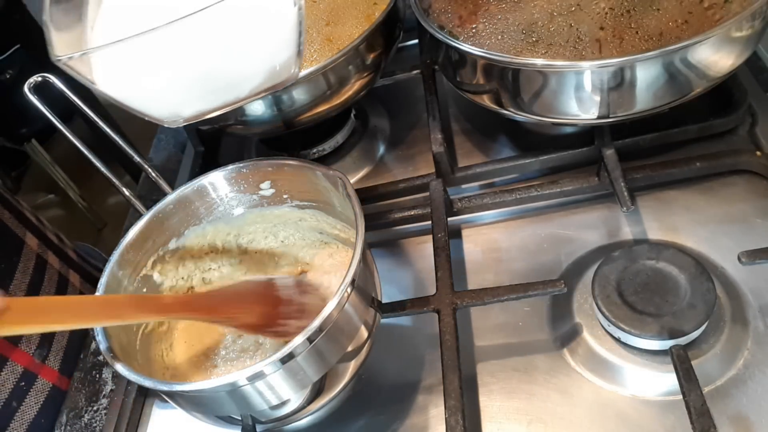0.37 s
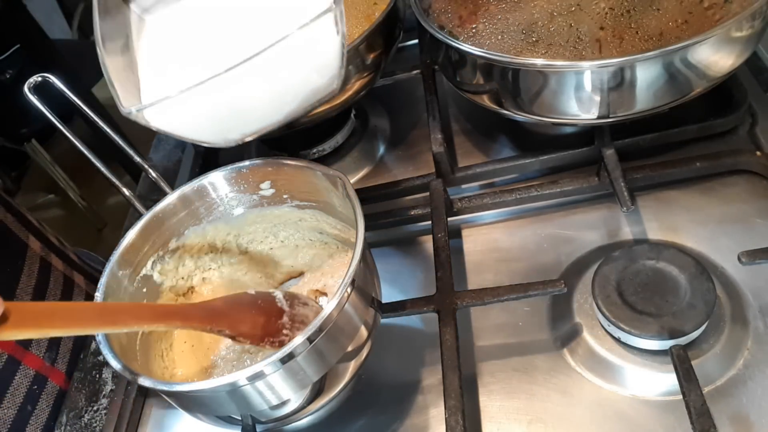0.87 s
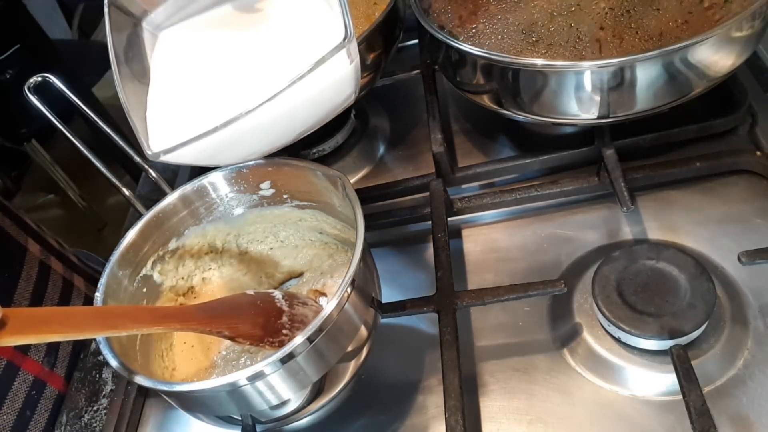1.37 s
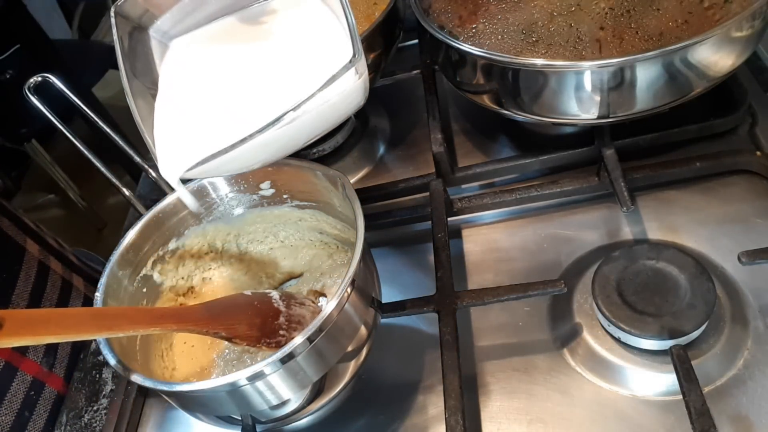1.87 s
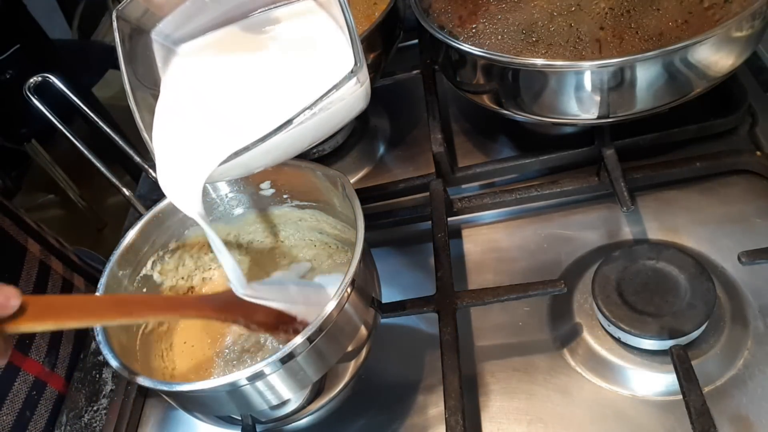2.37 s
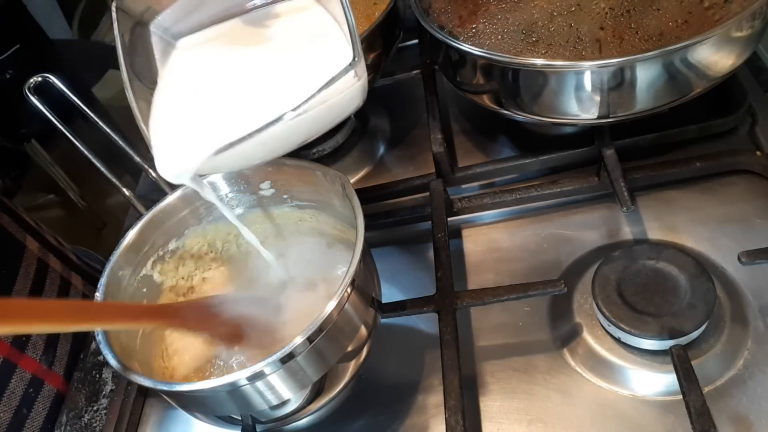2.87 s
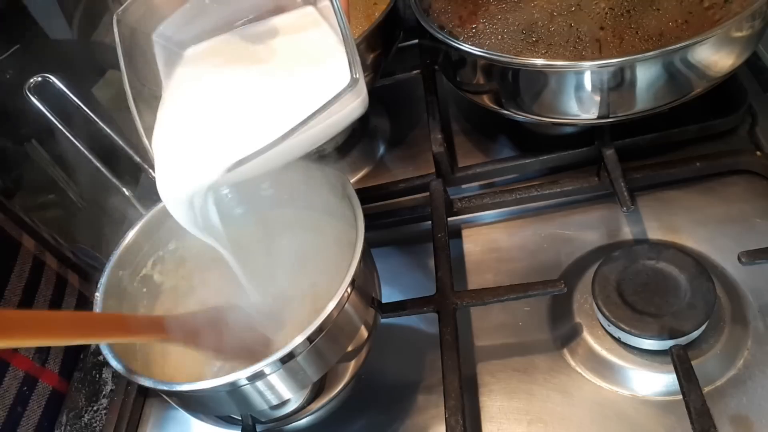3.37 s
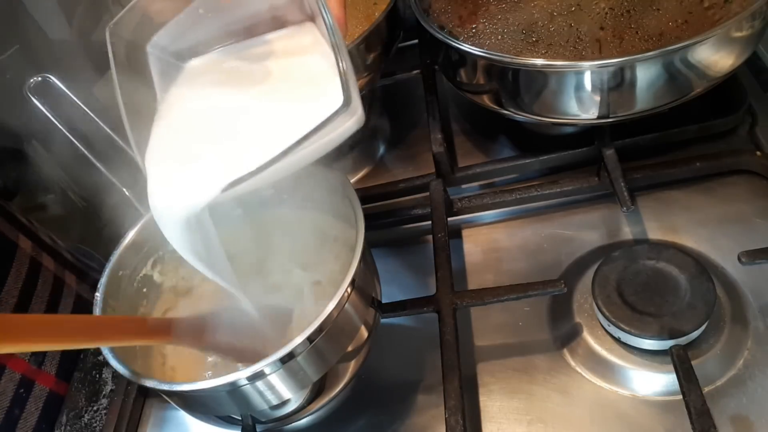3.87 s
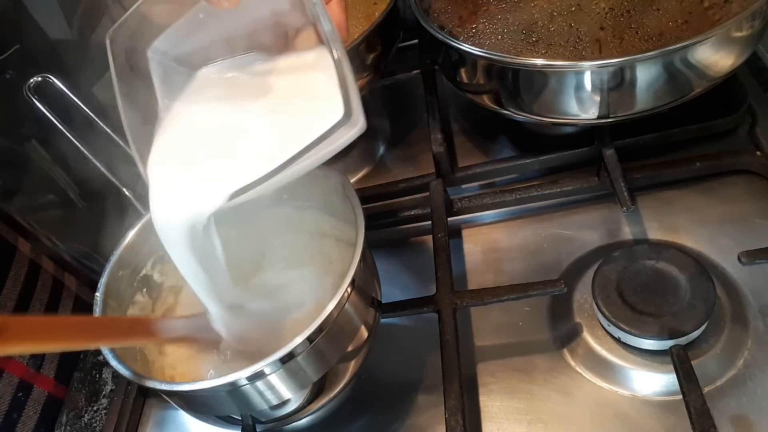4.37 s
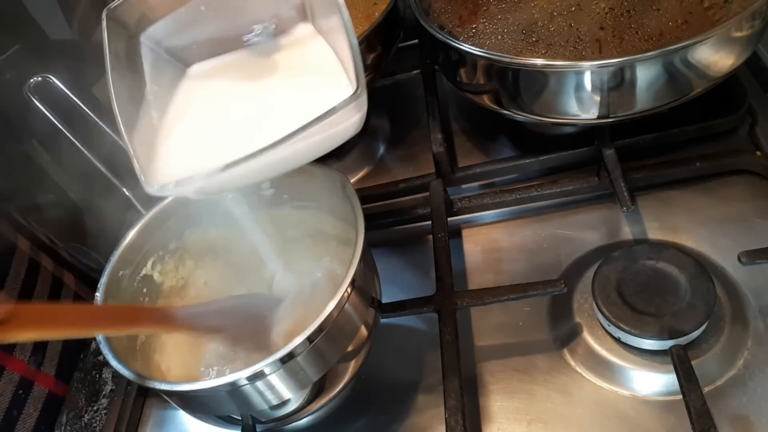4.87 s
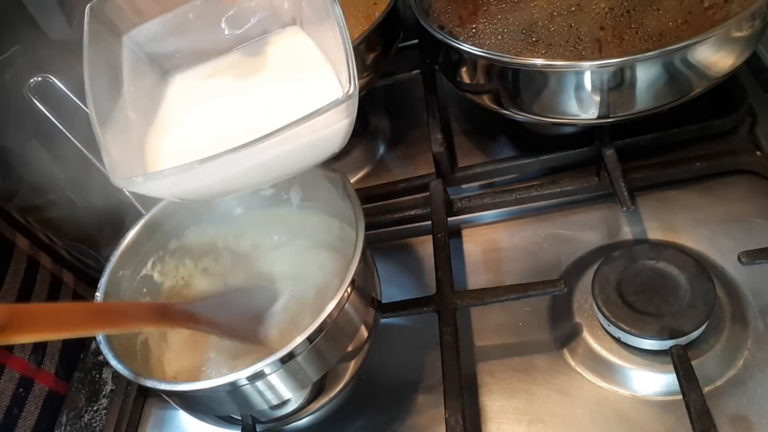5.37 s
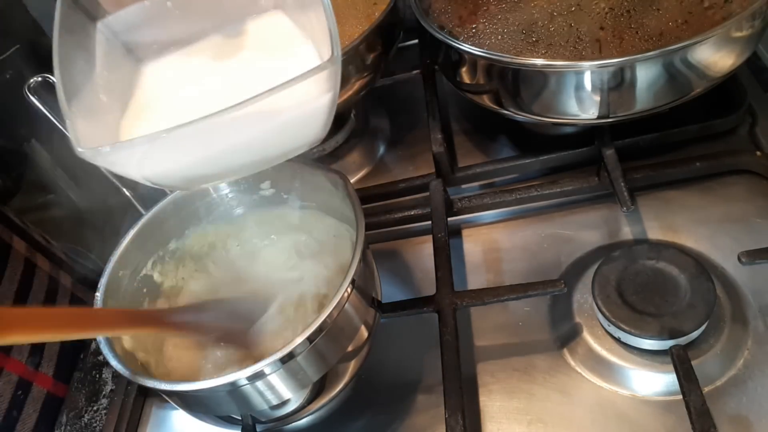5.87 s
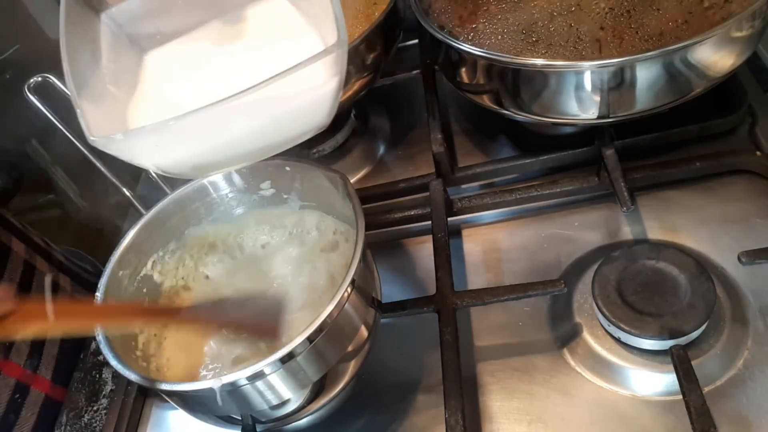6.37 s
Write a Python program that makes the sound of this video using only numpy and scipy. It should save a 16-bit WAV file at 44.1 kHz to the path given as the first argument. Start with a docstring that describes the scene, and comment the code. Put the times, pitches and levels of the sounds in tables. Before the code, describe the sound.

Fat ticks quietly in a hot pan over a low gas flame, then poured milk erupts into a loud steamy hiss and bubbling boil.

```python
"""Milk poured into hot butter and flour

In a kitchen, with a small two-port microphone close to a steel pan on a gas stove.
Fat ticks and sizzles as filtered noise over the burner's low roar, and a wooden spoon nudges and scrapes.
Cold milk lands: flickering noise, coloured as jets of many sizes, bursts out in a wide hiss of steam.
Boiling bubbles are noise and short pushes that ring the pan and its air, drum on its base and plop in tones."""
import sys
import numpy as np
from scipy import signal
from scipy.fft import rfft, irfft
from scipy.io import wavfile
from scipy.ndimage import uniform_filter1d

SR = 44100
rng = np.random.default_rng(int(sys.argv[2]) if len(sys.argv) > 2 else 0)


def gain_from_decibels(decibels):
    """Convert decibel values to linear amplitude factors."""
    exponent = np.asarray(decibels, float) / 20
    return 10 ** exponent


def output_pcm(signal):
    """Save a mono or channel-first signal as 16-bit PCM at the path in sys.argv[1].

    Samples are clipped to [-1, 1] before scaling.
    """
    pcm = np.clip(np.atleast_2d(signal).T, -1, 1) * 32767
    wavfile.write(sys.argv[1], SR, np.round(pcm).astype(np.int16))


N = 287310
T = np.arange(N) / SR
HZ = np.fft.rfftfreq(N, 1 / SR)
POUR_S = 2.083  # the first drop of milk lands

# Likeness of the two ports: (frequency [Hz], likeness [0 to 1])
PORT_LIKENESS = [(65, .95), (100, .99), (200, .95), (300, .8), (460, .52), (690, .8), (820, .96),
                 (1150, .72), (1900, .62), (3100, .18), (4400, .25), (7000, .04)]
# Phase by which the left port leads: (frequency [Hz], lead [rad])
PORT_LEAD = [(200, 0), (370, -1.0), (500, -.8), (600, .15), (950, -.5), (1250, -.1), (2200, -.8), (2700, 0)]
# Level difference of the ports: (frequency [Hz], left-right [dB])
PORT_LEAN = [(65, 1), (150, 1.6), (220, 3.3), (300, 3), (490, -6), (600, 3), (820, 3.2), (1150, -1),
             (1900, 0), (15000, .5)]
# Kitchen air spectrum, overall level set apart: (frequency [Hz], relative density [dB per Hz])
KITCHEN_AIR = [(18, -47), (30, -17), (106, -7), (384, -27), (449, -14), (499, -18), (844, -22),
               (1220, -28.5), (3580, -30), (6720, -24), (16000, -52)]
# Appliance hum: (mean frequency [Hz], level [dB])
HUM_TONES = [(100, -69), (447, -79)]
# Low resonances of stove and kitchen, widths before widening:
# (frequency [Hz], width [Hz], relative level under the flame [dB], relative level under the boiling [dB])
STOVE_MODES = [(64.7, 31, -6.5, -22), (95.3, 22.5, 2, -6.5), (147.6, 11, -2, -3), (198, 12, -10, -5.5),
               (282.4, 91, -18.5, -3.5), (348.3, 11, -22, -0.5), (448.7, 28, -28, -2.5),
               (546, 15.6, -29, -2)]
# Seething on the pan base as the milk pools: (time [s], level [dB])
BASE_SEETHE = [(2.1, -72), (2.23, -68), (2.33, -53), (2.52, -52), (2.61, -45.5), (3.8, -47), (4.45, -42.5),
               (5.2, -43.5), (5.6, -42.5), (6.3, -45), (6.51, -48)]
# Steady sizzle of the dry pan: (tearing jets [dB], fine jets [dB], pan ring [dB])
STEADY_SIZZLE = (-75, -82, -81)
# Louder sizzle where the paste is turned:
# (time [s], fade [s], tearing jets [dB], fine jets [dB], pan ring [dB])
PASTE_STIRS = [(.05, .015, -68, -68, -88), (.27, 0.069, -66, -71, -80), (.46, 0.056, -51, -57, -58),
               (.65, 0.12, -60, -62.5, -73), (.95, 0.076, -69, -85, -81), (1.28, 0.074, -85, -88, -79),
               (1.58, 0.087, -72, -82, -78), (1.98, .05, -68, -84, -90)]
# Fat spitting in the dry pan: (time [s], peak level [dB], pitch [Hz], left-right [dB])
FAT_TICKS = [(0.089, -48, 6950, 1.0), (0.229, -44, 6540, -2), (0.2598, -48, 5400, -1.0),
             (0.2763, -44, 6700, -4), (0.3391, -45, 5050, -3), (0.3676, -48, 6150, 0.5),
             (0.3935, -40, 5700, 0.5), (0.4309, -41, 6140, -3), (0.5975, -44, 4300, 0.0),
             (0.6564, -42.5, 4000, 4), (0.6918, -43, 7440, 0.0), (0.7462, -46.5, 4600, -1.0),
             (0.7913, -41, 4940, -3), (0.927, -44, 6400, 3), (0.9662, -48, 4600, 2.5),
             (1.016, -49, 3900, 2), (1.058, -48.5, 5030, 0.0), (1.3733, -51, 4700, 7),
             (1.3987, -50, 6200, 2.0), (1.4192, -53, 4300, 9), (1.448, -47, 4760, 0.5),
             (1.502, -47, 6700, -6), (1.5229, -52, 6780, -0.5), (1.5404, -47, 6460, 1.0),
             (1.5718, -46, 6240, 1.0), (1.6277, -45, 6250, -3), (1.6535, -55, 6440, 2),
             (1.7884, -57, 4830, 0), (1.8467, -50, 6930, -3), (1.941, -49, 7460, -3.0),
             (1.9625, -41.5, 5400, 1.0), (2.0025, -40, 4570, 1), (2.0358, -48, 4790, 0.5),
             (2.0537, -46, 4810, -1.5), (2.0832, -37, 6070, -4)]
# Pan and the air in it: (frequency [Hz], width [Hz], relative level [dB])
PAN_MODES = [(662.6, 90, -11), (776.7, 19, -5.5), (833.5, 35.6, 0), (890, 71.4, -2), (954, 47.4, -4.5),
             (1006, 43, -9), (1090, 27, -13), (1192, 43, -14.5), (1341, 16, -5), (1412, 29, -7),
             (1733, 235, -6.5), (1700, 91, -15.5), (1864, 46, -5), (2031, 62, -2), (2081, 55, -4),
             (2324, 112, -9), (2592, 41, -4.5), (2747, 145, -5.5), (2900, 250, 0), (2969, 250, -3),
             (4050, 960, -12)]
# Wooden spoon nudging the pan: (time [s], peak level of the low modes [dB], upper against low modes [dB])
SPOON_NUDGES = [(0.348, -52, -6), (0.472, -56, -7), (0.509, -47, -16), (0.605, -57, -5), (0.72, -60, 1),
                (1.353, -56, -12), (1.522, -65, -10), (1.569, -57.5, -12)]
# Spoon strokes: (start [s], end [s], level [dB], rasp frequency [Hz], rasp width [Hz])
SPOON_STROKES = [(.23, 0.306, -74, 2900, 505), (.3, .42, -72, 1660, 250), (0.325, 0.378, -73, 2900, 400),
                 (0.37, .472, -64.5, 2750, 500), (.35, 0.643, -69, 814, 70),
                 (1.225, 1.42, -68.5, 790, 1100)]
# Steam off the hot base once milk is in: (time [s], hiss level [dB])
STEAM_HISS = [(2.09, -84), (2.13, -37.5), (2.2, -42), (2.3, -46), (2.45, -43.5), (2.6, -37), (2.66, -31),
              (2.8, -27), (3.32, -24), (3.66, -30), (3.9, -30.5), (4.15, -30.5), (4.44, -28), (4.7, -29),
              (5.0, -30), (5.5, -33), (6.0, -35), (6.25, -36.5), (6.51, -37.5)]
# Coarse jets, before their bass loss: (frequency [Hz], relative density [dB per Hz])
COARSE_JETS = [(1820, -7), (3100, 0), (3670, -4), (4050, 0), (5840, -3), (6440, -1), (7840, -2.5),
               (8770, -12.5), (9500, -13.5), (12400, -31), (20900, -120)]
# Jets tearing through the fat, before their bass loss: (frequency [Hz], relative density [dB per Hz])
TEARING_JETS = [(880, -51), (1500, -32), (3230, -2), (3520, -7), (3940, -1), (6250, -2.5), (8040, -4),
                (8930, -19), (12000, -10), (15600, -39), (22000, -120)]
# Fine jets, before their bass loss: (frequency [Hz], relative density [dB per Hz])
FINE_JETS = [(5000, -47), (8500, -6), (9150, -4), (10800, 2.5), (12600, 2.5), (15100, 2.5), (15900, -11.5)]
# Jets tearing open: (time [s], fine jets [dB], tearing jets [dB], rise [s], fade [s])
JET_SPURTS = [(2.0833, -44, -66, .001, 0.017), (2.13, -35, -45, 0.017, 0.034),
              (2.16, -33, -24, 0.019, 0.024), (2.249, -45, -33, .015, 0.008),
              (2.325, -28, -39, 0.00083, .014), (2.36, -26, -34, .008, 0.008),
              (2.397, -31, -40, .006, 0.0083), (2.426, -33, -36, .001, 0.043),
              (2.493, -28, -28, 0.0047, 0.028), (2.57, -34, -33, .01, .02),
              (2.65, -24, -20.5, 0.022, 0.054), (2.865, -24, -23.5, 0.018, 0.043),
              (2.72, -32, -24.5, 0.017, 0.072), (2.94, -26, -27, .01, 0.024), (2.99, -39, -31, .01, 0.014),
              (3.139, -31, -24.5, 0.023, 0.0062), (3.94, -33, -26.5, 0.0035, 0.11),
              (4.44, -32, -28, 0.047, 0.013), (5.55, -41, -33, 0.014, 0.013), (5.62, -33, -30, 0.056, .008),
              (5.67, -47, -31, 0.009, 0.015), (5.725, -43, -28, .01, .015), (5.81, -44, -36, .003, .02),
              (5.945, -28, -30, .002, 0.032), (6.22, -39, -35, 0.017, 0.022),
              (6.31, -34, -32, 0.0072, 0.022)]
# Bursting bubbles, small ones ring the upper modes:
# (time [s], level of the low modes [dB], upper against low modes [dB])
BUBBLE_BOIL = [(2.09, -80, -4), (2.16, -50.5, 7), (2.21, -39.5, 1.5), (2.28, -32, -12), (2.36, -30.5, -3.5),
               (2.55, -30, -3), (2.8, -30, 1.5), (3.1, -30, 3.5), (3.4, -31.5, 1), (3.65, -31, -4.5),
               (4.1, -36, 0.5), (4.5, -33.5, 1), (5.0, -35, -0.5), (5.3, -38, 1), (5.6, -37, 2),
               (5.9, -34, -0.5), (6.1, -37.5, 1), (6.51, -43.5, 2)]
# Clusters of large bubbles swell the lowest pan modes: (time [s], peak level [dB])
BUBBLE_CLUSTERS = [(2.281, -38), (2.362, -22.5), (2.415, -26), (2.679, -30), (2.77, -29), (3.121, -25.5),
                   (3.3, -32), (3.62, -30), (4.058, -28.5), (4.171, -24.5), (4.31, -31), (4.53, -24),
                   (4.7, -31), (4.88, -31), (4.989, -26.5), (5.22, -31), (5.288, -27), (5.35, -27),
                   (5.4, -24.5), (5.67, -28), (5.729, -24.5), (5.819, -28), (6.07, -34), (6.113, -26),
                   (6.221, -37), (6.291, -33.5), (6.49, -32.5)]
# Large bubbles bursting: (time [s], peak level of the low modes [dB], upper against low modes [dB])
BUBBLE_POPS = [(2.358, -21.5, -6), (2.395, -22, -6), (2.461, -17.5, -5), (2.565, -24, 6), (2.644, -26, -7),
               (2.746, -21, 4), (2.809, -14, -4), (2.972, -13.5, -8), (3.103, -26, -12), (3.242, -31, -6),
               (3.341, -33, -10), (3.563, -19.5, -16), (3.615, -26, -10), (3.702, -24.5, -14),
               (4.164, -21, -14), (4.319, -36, -5), (4.433, -20.5, 2), (4.515, -29, -6), (5.287, -21, -3),
               (5.466, -22.5, -5), (5.552, -25.5, -14), (5.709, -28, -4), (5.807, -31, -1),
               (5.898, -25, -12), (6.108, -22, -8)]
# Sharp snaps in the boiling milk: (time [s], peak level [dB], pitch [Hz], left-right [dB])
MILK_SNAPS = [(2.366, -24, 1850, -0.5), (3.3104, -23, 2880, -3), (3.4298, -20, 4010, 0),
              (6.103, -13.5, 4050, -9)]
# Round bubbles plopping in the thickening sauce:
# (time [s], peak level of the tone [dB], pitch at the peak [Hz], left-right [dB])
SAUCE_PLOPS = [(2.795, -24, 1920, 5), (4.471, -29.5, 2780, 0), (5.445, -35, 1920, -1),
               (6.014, -29.5, 1960, 4), (6.467, -36, 1970, -1)]


def evened(x):
    """Scales to rms 1."""
    return x / np.sqrt(np.mean(x ** 2) + 1e-20)


def read(points, hz):
    """Reads a spectrum on a log-frequency axis."""
    f, value = np.transpose(points)
    return np.interp(np.log(hz + 1), np.log(f + 1), value)


def columns(rows):
    """Curve columns at every sample."""
    s, *values = np.transpose(rows)
    return [np.interp(T, s, v) for v in values]


def sides(left_right_db):
    """Left and right gains that differ by the given dB."""
    return gain_from_decibels(np.array([[left_right_db], [-left_right_db]]) / 2)


def add_at(out, s, sound):
    """Adds a short sound in place, starting at s seconds."""
    part = out[:, round(s * SR):][:, :sound.shape[1]]
    part += sound[:, :part.shape[1]]


def ring(x, hz, width):
    """A causal two-pole resonance of gain 1."""
    return signal.lfilter(*signal.iirpeak(hz, hz / width, SR), x)


def bursts(per_s, spread_db, decay_s, steady):
    """Loudness of many overlapping grains: sudden starts, quick fades, a few large ones."""
    size_db = spread_db * np.minimum(rng.exponential(1, N), 4)
    size = gain_from_decibels(size_db) * (rng.random(N) < per_s / SR)
    power = signal.lfilter([1], [1, -np.exp(-1 / (decay_s * SR))], size ** 2)
    return np.sqrt(steady + power / power.mean())


def swells(s, db, rise_s, fade_s):
    """Power of events whose amplitude swells up exponentially to a moment and dies down after it."""
    t = np.arange(N // 16 + 2) * 16 / SR  # every 16th sample is enough
    power = np.zeros(len(t))
    for at, peak_db, rise, fade in np.broadcast(s, db, rise_s, fade_s):
        away = np.where(t < at, (at - t) / rise, (t - at) / fade)
        power += gain_from_decibels(peak_db) ** 2 * np.exp(-2 * away)
    return np.interp(T, t, power)


def ports(loudness):
    """Noise as two nearby microphone ports hear it: alike in the bass, mostly unrelated in the treble."""
    left, other = rfft(loudness * rng.standard_normal((2, N)))
    same = np.clip(read(PORT_LIKENESS, HZ), 0, 1)
    shared = same * left * np.exp(-1j * read(PORT_LEAD, HZ))
    right = shared + np.sqrt(1 - same ** 2) * other
    lean_db = read(PORT_LEAN, HZ) / 2
    return irfft(np.array([left * gain_from_decibels(lean_db), right * gain_from_decibels(-lean_db)]), N)


def kitchen():
    """Faint steady air noise of the room and an appliance hum whose pitch wavers."""
    air_db, waver_hz = -72.5, 3.7
    air = irfft(rfft(ports(np.ones(N))) * gain_from_decibels(read(KITCHEN_AIR, HZ)) * (HZ > 300), N)
    waver = evened(uniform_filter1d(rng.standard_normal((len(HUM_TONES), N)), size=6000))
    hum = np.zeros(N)
    for (hz, db), w in zip(HUM_TONES, waver):
        hum += gain_from_decibels(db) * np.sin(2 * np.pi * np.cumsum(hz + waver_hz * w) / SR)
    return gain_from_decibels(air_db) * evened(air) + hum * sides(1.2)


def stove():
    """The flame's roar and, once milk boils, the seething base excite the same low resonances."""
    flame_db, sway_db = -59, 1.5
    depth_db, deepen_db_per_s = -4, 0.61  # deeper milk drums lower
    flame, seethe = ports(np.ones(N)), ports(np.ones(N))
    roar, drum = 0, []
    for hz, width, under_flame_db, under_boil_db in STOVE_MODES:
        roar += gain_from_decibels(under_flame_db) * ring(ring(flame, hz, 1.1 * width), hz, 1.1 * width)
        drum.append(gain_from_decibels(under_boil_db) * ring(ring(seethe, hz, 1.6 * width), hz, 1.45 * width))
    deep, body = evened(sum(drum[:4])), evened(sum(drum[4:]))
    steps = np.arange(0, T[-1] + .2, .1)
    body_sway, deep_sway = [gain_from_decibels(sway_db * np.interp(T, steps, d))
                            for d in rng.standard_normal((2, len(steps)))]
    level = (T > POUR_S) * gain_from_decibels(columns(BASE_SEETHE)[0])
    deep_gain = gain_from_decibels(depth_db + deepen_db_per_s * (T - POUR_S)) * deep_sway
    return gain_from_decibels(flame_db) * evened(roar) + level * (body_sway * body + deep_gain * deep)


def dry_sizzle(index):
    """Power of one part of the fat's sizzle: a steady level, with a swell at each stir."""
    s, fade_s, *part_db = np.transpose(PASTE_STIRS)
    return gain_from_decibels(STEADY_SIZZLE[index]) ** 2 + swells(s, part_db[index], 0.91 * fade_s, fade_s)


def ticks(rows, click):
    """Sudden bursts, as of water droplets in hot fat: a wide click, a short ring and a fizzing tail."""
    out, t = np.zeros((2, N)), np.arange(1500) / SR
    fade = np.exp(-t / 0.0011) + 0.43 * np.exp(-t / 0.011)
    snaps = rng.standard_normal((len(rows), 2, len(t))) * fade + 1.2 * (t == 0)
    for (s, db, hz, left_right_db), snap in zip(rows, snaps):
        sound = ring(ring(snap, hz, 0.25 * hz), hz, 0.49 * hz) + click * ring(snap, 2300, 3100)
        add_at(out, s, gain_from_decibels(db) * sides(left_right_db) * sound / abs(sound).max())
    return out


def small_ticks():
    """Rows of many fainter droplets that burst at random moments until the milk lands."""
    count, faintest_db, spread_db = 60, -62, 3.5
    low_hz, high_hz = 4250, 7900
    when, size, pitch, side = rng.random((count, 4)).T
    level_db = faintest_db - spread_db * np.log(1 - size)  # a few stand out
    return np.transpose([when * POUR_S, level_db, low_hz + (high_hz - low_hz) * pitch, 8 * (side - .5)])


def pan_air(drive, weights):
    """The lowest modes of the pan, and the upper ones apart, each with its own weight."""
    drive = signal.lfilter(*signal.butter(2, 650, "high", fs=SR), drive)  # an open pan holds no bass
    low = high = 0
    for weight, (hz, width, db) in zip(weights, PAN_MODES):
        mode = weight * gain_from_decibels(db) * ring(drive, hz, width)
        if hz < 1250:
            low = low + mode
        else:
            high = high + mode
    return low, high


def blows(rows, puff_s, steel):
    """Each blow is a short push that rings the pan's air and its steel wall."""
    wall_hz, wall_width_hz = 838, 18
    out, t = np.zeros((2, N)), np.arange(3000) / SR
    puffs = (t == 0) + 0.098 * rng.standard_normal((len(rows), len(t))) * np.exp(-t / puff_s)
    puffs = signal.lfilter(*signal.butter(2, 3500, fs=SR), puffs)  # a soft push has no hard edge
    for (s, db, sharp_db), puff in zip(rows, puffs):
        low, high = pan_air(puff, np.ones(len(PAN_MODES)))  # one push starts all modes together
        wall = ring(puff, wall_hz, wall_width_hz)
        sound = low / abs(low).max() + gain_from_decibels(sharp_db) * high / abs(high).max()
        sound = sound + steel * wall / abs(wall).max()
        add_at(out, s, gain_from_decibels(db) * sound * sides(2.4))
    return out


def scrapes():
    """The spoon drags through the paste: a stream of tiny slips, each stroke rising fast and fading."""
    slips = ports(bursts(per_s=150, spread_db=-2.5, decay_s=.0015, steady=0.5))
    out = np.zeros((2, N))
    for start, end, db, hz, width in SPOON_STROKES:
        # the end values hold outside the stroke, so a faint rasp stays
        stroke = np.interp(T, [start, start + 0.0088, end - .04, end], [0.12, 0.86, 1.0, 0.072])
        out += gain_from_decibels(db) * stroke * evened(ring(ring(slips, hz, width), hz, width))
    return out


def colour(x, spectrum, patchy_db):
    """Shapes the spectrum; drifting patches as jets of different size come and go."""
    hz, t, z = signal.stft(x, SR, nperseg=256, noverlap=192)
    field = rng.standard_normal(z.shape[1:])
    patches = evened(uniform_filter1d(uniform_filter1d(field, size=7, axis=0), size=30, axis=1))
    small_jets = hz ** 2 / (hz ** 2 + 2500 ** 2)  # tiny openings radiate little bass
    z = z * gain_from_decibels(read(spectrum, hz)[:, None] + patchy_db * patches) * small_jets[:, None]
    return evened(signal.istft(z, SR, nperseg=256, noverlap=192)[1][:, :N])


def steam():
    """Steam forced out of the paste: coarse, tearing and fine jets share one flicker once the pan is wet."""
    bright_db, bright_per_db, full_hiss_db = -1, -0.1, -23.5  # weaker steam leaves by finer jets
    first_dull_db, first_dull_s = 6, 0.17  # cold milk smothers the fine jets at first
    hiss_db, = columns(STEAM_HISS)
    fine_hiss_db = hiss_db + bright_db + bright_per_db * (hiss_db - full_hiss_db)
    fine_hiss_db -= first_dull_db * np.exp(-abs(T - POUR_S) / first_dull_s)

    # dry fat crackles in separate grains
    spitting = bursts(per_s=180, spread_db=2.0, decay_s=0.0011, steady=0.45)
    rushing = bursts(per_s=1200, spread_db=3.0, decay_s=0.0053, steady=0.74)
    wet = T > POUR_S
    flicker = np.where(wet, evened(rushing), evened(spitting))
    coarse = colour(ports(rushing), COARSE_JETS, patchy_db=1.5)
    tearing = colour(ports(flicker), TEARING_JETS, patchy_db=2.1)
    fine = colour(ports(rushing), FINE_JETS, patchy_db=0.9)

    s, fine_db, tearing_db, rise_s, fade_s = np.transpose(JET_SPURTS)
    tearing_power = dry_sizzle(index=0) + swells(s, tearing_db, rise_s, fade_s)
    fine_power = dry_sizzle(index=1) + wet * gain_from_decibels(fine_hiss_db) ** 2 + swells(s, fine_db, rise_s, fade_s)
    return coarse * wet * gain_from_decibels(hiss_db) + tearing * np.sqrt(tearing_power) + fine * np.sqrt(fine_power)


def boiling():
    """Countless bubbles burst at the surface; as the boiling spot wanders, each mode comes and goes."""
    cluster_rise_s, cluster_fall_s, cluster_sharp_db = 0.0037, 0.0078, -12.5
    boil_db, sharp_db = columns(BUBBLE_BOIL)
    steps = np.arange(0, T[-1] + .1, .04)
    drift_db = 1.2 * rng.standard_normal((len(PAN_MODES), len(steps)))
    # neighbouring modes ring in opposite polarity
    weights = [(-1) ** k * gain_from_decibels(np.interp(T, steps, d)) for k, d in enumerate(drift_db)]
    bubbles = ports(bursts(per_s=440, spread_db=2.0, decay_s=0.0014, steady=1.1))
    low, high = pan_air(bubbles, weights)
    steady = dry_sizzle(index=2) + (T > POUR_S) * gain_from_decibels(boil_db) ** 2
    clusters = swells(*np.transpose(BUBBLE_CLUSTERS), cluster_rise_s, cluster_fall_s)
    high_power = steady * gain_from_decibels(sharp_db) ** 2 + clusters * gain_from_decibels(cluster_sharp_db) ** 2
    return np.sqrt(steady + clusters) * evened(low) + np.sqrt(high_power) * evened(high)


def plops():
    """A bubble's tone rises as it opens, with froth hissing at the same pitch."""
    rise_s, fade_s, glide, glide_s = 0.0065, 0.0089, 0.079, 0.049
    out, froth = np.zeros((2, N)), rng.standard_normal(N)
    for s, db, hz, left_right_db in SAUCE_PLOPS:
        bend = 1 + glide * np.clip((T - s) / glide_s, -1, 1)
        tone = np.sin(2 * np.pi * hz * (T - s) * bend)
        sound = tone + evened(ring(ring(froth, hz, 800), hz, 800))
        out += np.sqrt(swells(s, db, rise_s, fade_s)) * sound * sides(left_right_db)
    return out


def scene():
    """All sources at the microphone."""
    fat = ticks(FAT_TICKS, click=0.18) + ticks(small_ticks(), click=0.24)
    spoon = blows(SPOON_NUDGES, puff_s=0.0033, steel=0.44) + scrapes()
    bubbles = blows(BUBBLE_POPS, puff_s=.003, steel=.15) + ticks(MILK_SNAPS, click=0.7) + plops()
    return kitchen() + stove() + fat + spoon + steam() + boiling() + bubbles


def band_limit(x):
    """A steep low-pass at the top of the band."""
    return signal.sosfilt(signal.butter(12, 17000, fs=SR, output="sos"), x)


def record(dry):
    """The small microphone loses the deepest bass, and a steep filter limits the treble."""
    mix = signal.lfilter(*signal.butter(1, 70, "high", fs=SR), dry)
    edge = signal.firwin(401, 16080, window=("kaiser", 8), fs=SR)
    mix = signal.oaconvolve(mix, edge[None], "same", axes=1)
    return band_limit(mix)


dry = scene()
out = record(dry)
output_pcm(out)
```